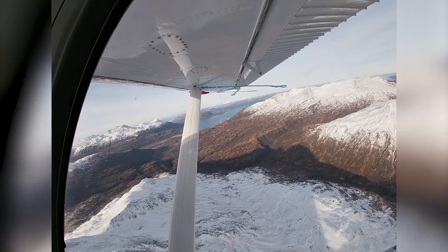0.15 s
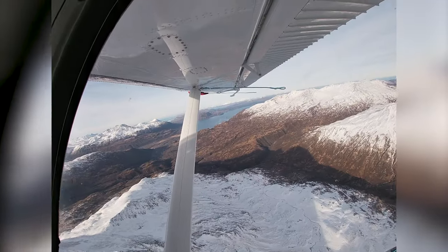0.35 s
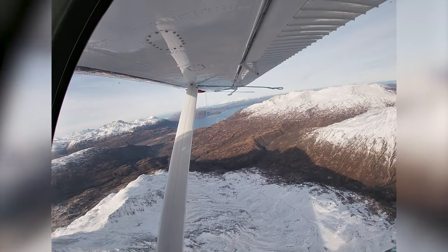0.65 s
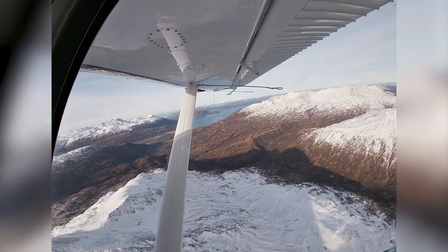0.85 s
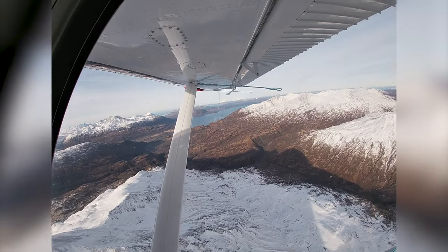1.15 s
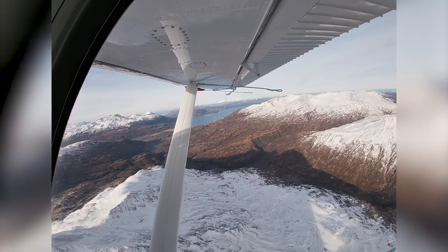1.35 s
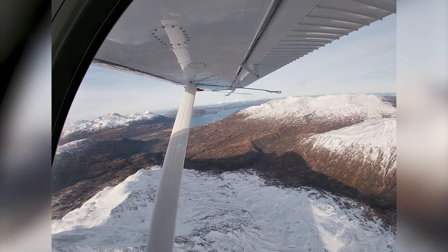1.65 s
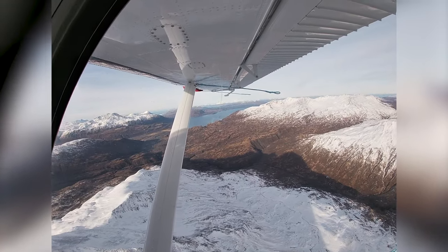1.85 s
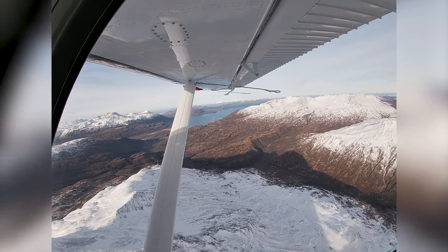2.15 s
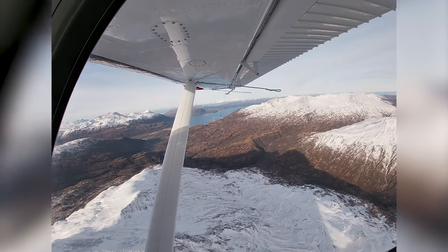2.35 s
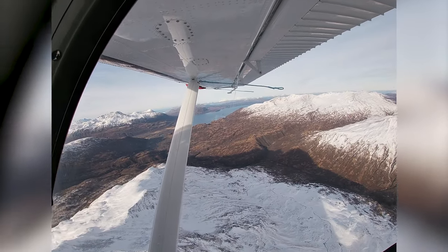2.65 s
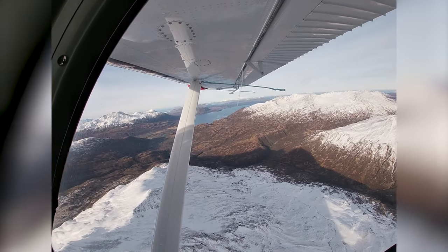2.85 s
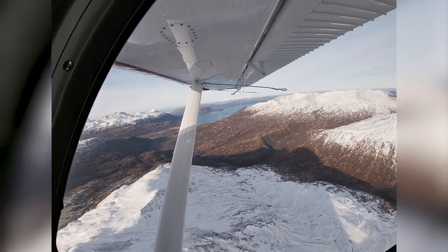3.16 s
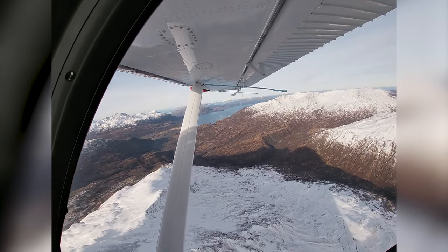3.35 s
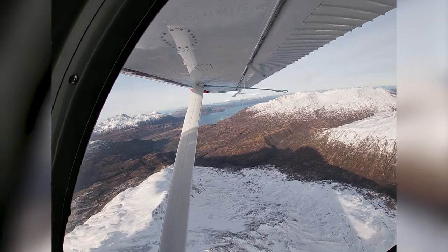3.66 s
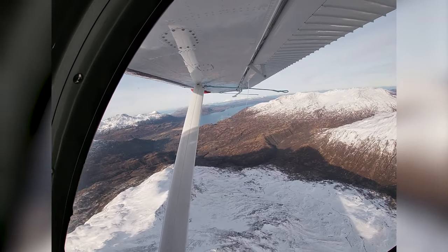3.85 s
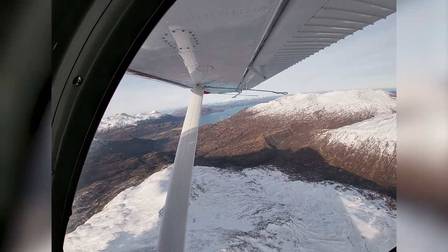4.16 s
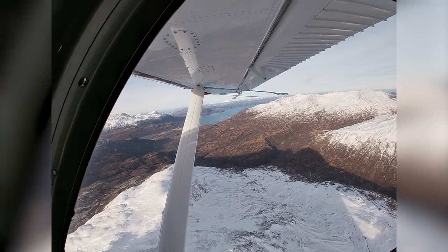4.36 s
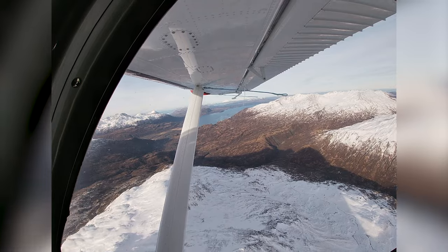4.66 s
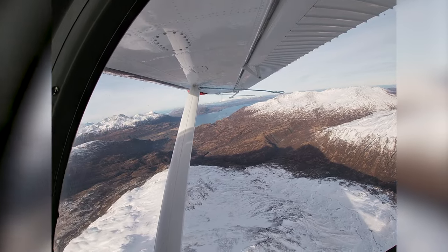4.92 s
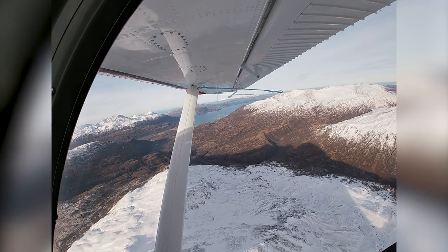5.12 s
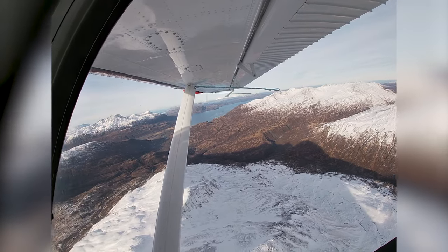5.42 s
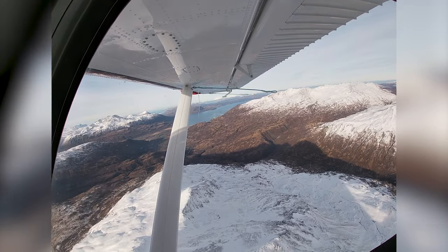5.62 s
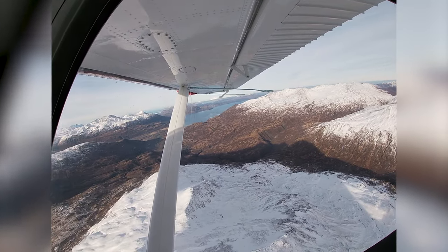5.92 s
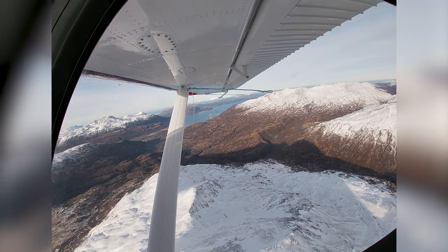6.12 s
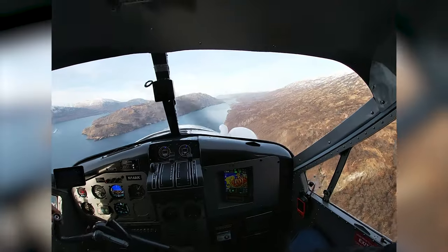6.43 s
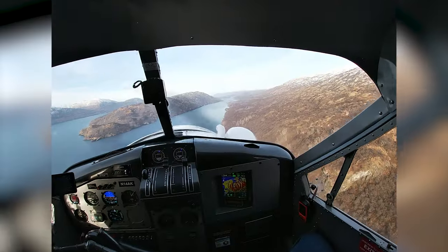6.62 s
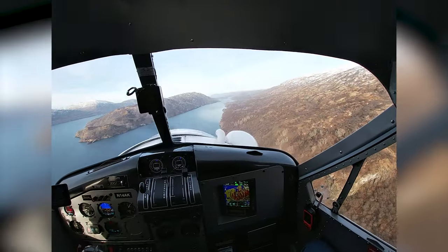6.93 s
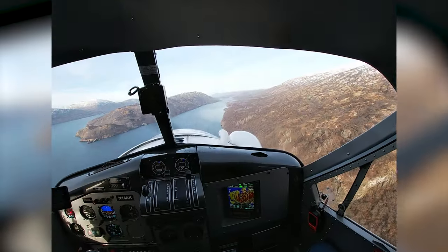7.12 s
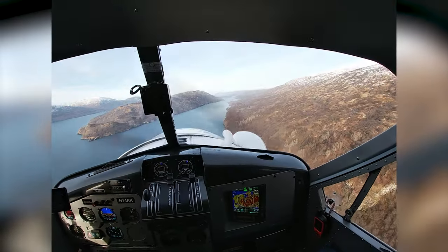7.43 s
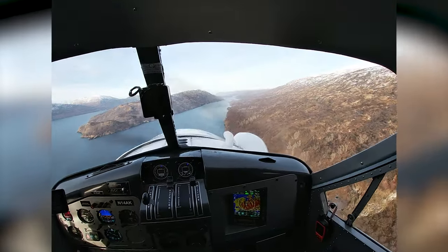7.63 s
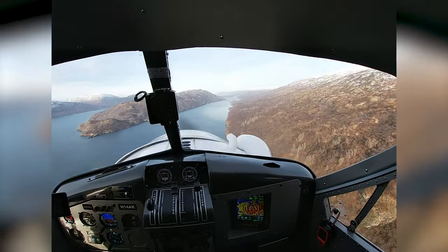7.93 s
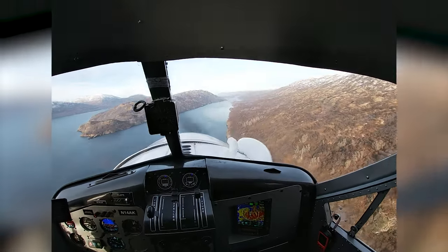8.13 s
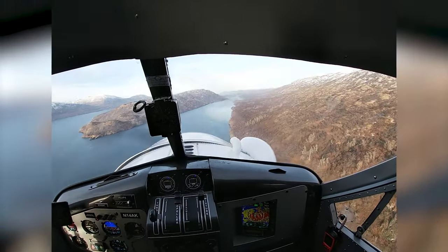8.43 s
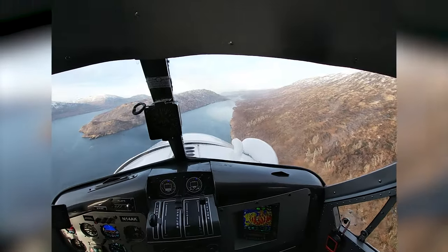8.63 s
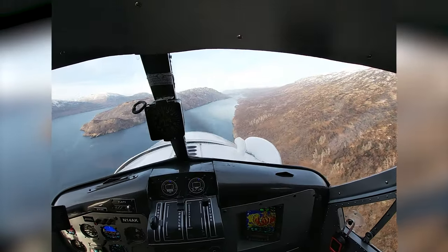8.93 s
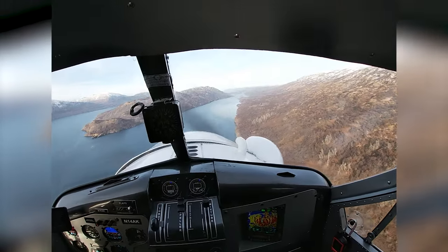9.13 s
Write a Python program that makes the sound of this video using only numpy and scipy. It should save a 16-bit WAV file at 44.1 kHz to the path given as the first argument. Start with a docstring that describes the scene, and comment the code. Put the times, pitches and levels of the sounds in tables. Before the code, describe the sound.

From 0 s the listener sits by the side window of a small propeller plane at cruise. A dense, low engine drone, strongest from about 60 to 190 Hz, throbs rapidly and evenly, with rumbling hull noise and soft slipstream hiss. From about 1.4 to 3 s the wind and the engine's rasp swell, and a window panel adds a faint, fluttering mid-pitched ring; a very faint whine and thin blade buzz sit above. This holds steadily to about 5 s, the ring then easing. At 6.3 s a tiny sharp click marks an instant change to the front seat: deeper, rounder, more propeller throb, less rasp. A brief low growl swells near 6.5 s, then the wind hiss dies down over the next two seconds. The engine's edge wavers, filling out from about 7.9 s, and the drone continues until it stops at about 9.3 s. Mono, close cabin sound.

```python
"""Cruising in a radial-engine plane

A nine-cylinder engine throbs under the hiss of the slipstream in a small propeller plane.
By the side window the exhaust booms and the wind swells; after an abrupt change with a click,
facing the windscreen, the three-blade propeller is stronger and the wind dies down.
Engine and blades are sums of shaft-locked harmonics; wind and the ringing panel are shaped noise.
"""
import sys
import numpy as np
from scipy import signal
from scipy.fft import rfft, irfft, next_fast_len
from scipy.io import wavfile
from scipy.ndimage import uniform_filter1d

SR = 44100
rng = np.random.default_rng(int(sys.argv[2]) if len(sys.argv) > 2 else 0)


def output_pcm(signal):
    """Save a mono or channel-first signal as 16-bit PCM at the path in sys.argv[1].

    Samples are clipped to [-1, 1] before scaling.
    """
    pcm = np.clip(np.atleast_2d(signal).T, -1, 1) * 32767
    wavfile.write(sys.argv[1], SR, np.round(pcm).astype(np.int16))


N = 409248
TIME = np.arange(N) / SR
CHANGE_S = 6.2815  # when the side seat gives way to the front seat
CYLINDERS = 9
BLADES_PER_CYCLE = 6  # three blades, two shaft turns per engine cycle
WHINE_ORDER = 31.7  # multiple of the cycle rate
HISS_PULSE_AT = 0.36  # share of the engine cycle at which the hiss and the window's ring peak (0-1)
BAND_LIMIT_HZ = 15800

# Cruise speed at each seat, drifting a little: [t/s, f/Hz of the engine cycle, two shaft turns each]
SIDE_SPEED = [(0, 15.815), (0.5, 15.816), (0.9, 15.836), (1.3, 15.826), (2, 15.843), (2.6, 15.821),
              (3.25, 15.807), (3.85, 15.826), (4.7, 15.807), (6.28, 15.822)]
FRONT_SPEED = [(6.28, 15.838), (7.1, 15.875), (7.6, 15.85), (8.2, 15.873), (8.8, 15.84), (9.28, 15.808)]
# Engine orders as the cabin colours them, 9 the firing rate and 6 the blade rate; the low ones boom, # and the
# rasp grows on the upper ones, from about 500 Hz: [multiple of the cycle rate, relative level/dB]
SIDE_ORDERS = [(2, -35.5), (3, -25.5), (4, -10.5), (5, -21.5), (6, -18.0), (7, -12.5), (8, -26.0),
               (9, -5.5), (10, -17.5), (11, 0.0), (12, -8.0), (13, -24.5), (14, -23.5), (15, -35.5),
               (16, -17.0), (17, -27.0), (18, -19.0), (19, -23.0), (20, -17.5), (21, -27.5), (22, -26.0),
               (23, -30.5), (24, -41.0), (25, -23.5), (26, -30.0), (27, -30.0), (28, -26.0), (29, -35.5),
               (30, -23.0), (33, -36.0), (34, -42.0), (35, -34.0), (36, -34.5), (39, -29.5), (40, -37.0),
               (41, -34.0), (42, -32.0), (43, -37.5), (45, -39.0), (47, -41.0), (48, -37.0)]
FRONT_ORDERS = [(2, -26.0), (3, -26.0), (4, -3.0), (5, -7.0), (6, 0.0), (7, -3.0), (8, -16.5), (9, -2.0),
                (10, -9.5), (11, 0.0), (12, -8.0), (13, -13.0), (14, -18.5), (15, -21.0), (16, -16.0),
                (17, -15.5), (18, -12.5), (19, -14.5), (20, -13.5), (21, -14.5), (22, -21.5), (23, -28.5),
                (24, -20.5), (25, -18.0), (26, -24.0), (27, -18.0), (28, -29.0), (29, -30.0), (30, -21.0),
                (31, -27.5), (32, -34.5), (33, -31.5), (34, -36.0), (35, -25.0), (36, -30.5), (37, -41.0),
                (38, -33.5), (41, -43.0), (42, -33.5), (44, -36.5), (48, -37.5)]
# Faint buzz of the blade tips: [multiple of the blade rate, rms level/dB before swell and waver]
SIDE_BUZZ = [(9, -61), (10, -57.5), (12, -61.5), (14, -71), (15, -71), (17, -70)]
FRONT_BUZZ = [(9, -61), (11, -69), (12, -61), (14, -68), (16, -71)]
# Colour of the air noise in the cabin: [f/Hz, relative level/dB per Hz]
SIDE_AIR = [(15, -19), (55, -5), (95, -2), (135, 1.3), (220, -3), (290, -6.5), (370, -13), (470, -14),
            (580, -16.5), (690, -18), (810, -24.5), (1250, -31.7), (1700, -29), (2900, -30.3),
            (3800, -37.2), (5700, -37.1), (6900, -52.5), (13000, -76)]
FRONT_AIR = [(15, -18), (55, -4), (100, -2), (135, -1.5), (170, -5.5), (220, -4), (310, -6.5), (500, -18),
             (640, -24.5), (780, -25.5), (1200, -29.3), (1500, -33), (1850, -37.5), (3000, -38.3),
             (4200, -44.8), (5800, -45), (6900, -58.5), (9000, -66), (13000, -83)]
# Slipstream swelling by the window, dying down at the windscreen:
# [start t/s, from level/dB, to level/dB, time constant/s]
SIDE_WIND = (1.37, -7.5, 1.5, 0.74)
FRONT_WIND = (6.5, 3, -5, 0.78)
# How strongly each pitch follows the wind's swell: [f/Hz, share/dB per dB]
SIDE_WIND_SHARE = [(250, 0.08), (450, 0), (650, 0.6), (1000, 0.7), (1350, 1.05), (2500, 0.76), (6000, 0.9)]
FRONT_WIND_SHARE = [(280, -0.017), (450, -0.4), (750, 0.7), (1350, 0.9), (2500, 0.92), (6000, 0.72)]
# Edge of the engine note, the level of its upper orders, growing by the window:
# [start t/s, from level/dB, to level/dB, time constant/s]
SIDE_EDGE = (1.5, -7, 0.04, 0.6)
# The same edge at the windscreen, thinning and filling out again: [t/s, level/dB]
FRONT_EDGE = [(6.3, -10), (6.55, -12), (6.95, -5), (7.2, -7.5), (7.5, -8), (7.9, 0.5), (8.5, 3), (9.28, 1)]
# Growl around 300 Hz at the windscreen: [t/s, level/dB]
FRONT_GROWL = [(6.3, 0), (6.55, 4), (6.8, -1), (7.1, 2), (7.5, -0.5), (7.9, 0.5), (8.3, 0.5), (9.28, 1)]
# The window's ring builds, holds and eases: [t/s, level/dB]
PANEL_SWELL = [(0, -9), (1.4, -8), (2.2, -2.5), (3.1, 0.5), (5.1, 0), (6.28, -5)]
# How the drone reaches each seat: [time round the exhaust ring/s, lag of the hull's bending waves
# at 100 Hz/s, share of a blade passage by which the propeller trails the engine (0-1),
# shift against the engine cycle/s, cabin boom f/Hz, boom width/Hz]
SIDE_PATH = (.0033, .0486, .68, .053, 144.5, 85)
FRONT_PATH = (.0072, .0369, .859, .0239, 91, 92)


def gain_of(db):
    """Turns decibels into amplitude."""
    return 10 ** (np.asarray(db) / 20)


def evened(x):
    """Scales to rms 1."""
    return x / np.sqrt(np.mean(abs(x) ** 2) + 1e-20)


def curve(points):
    """Joins (time, value) points by straight lines."""
    return np.interp(TIME, *np.transpose(points))


def settle(swell, t=TIME):
    """A level in dB that holds, then eases exponentially towards a new value."""
    start_s, from_db, to_db, ease_s = swell
    return to_db + (from_db - to_db) * np.exp(-np.maximum(t - start_s, 0) / ease_s)


def read(points, hz):
    """Reads a spectrum on a log-frequency axis."""
    f, value = np.transpose(points)
    return np.interp(np.log(hz + 1), np.log(f), value)


def wander(rate_hz):
    """Smooth random motion of rms 1, moving up to about rate_hz times a second."""
    size = 2048
    f = np.fft.rfftfreq(size, N / SR / size)
    lowpass = (f > 0) / (1 + (f / rate_hz) ** 4)
    slow = irfft(rfft(rng.standard_normal(size)) * lowpass)
    return np.interp(TIME, np.linspace(0, N / SR, size), evened(slow))


def band_filter(hz, width_hz):
    """A gentle resonance-like band around one pitch."""
    return signal.butter(2, [hz - width_hz / 2, hz + width_hz / 2], "bandpass", fs=SR, output="sos")


def crank(speed, jitter_cycles=0.00018, jitter_hz=3.3):
    """Engine cycles counted since the start; the shaft never turns quite evenly."""
    return np.cumsum(curve(speed)) / SR + jitter_cycles * wander(jitter_hz)


def air(spectrum, wind, share, level_db, patchy_db, gust_db):
    """Turbulence on the hull: a nearly steady rumble, and a hiss at the window seals that follows the wind."""
    size, hop = 2048, 512
    frames, hz = N // hop + 5, np.fft.rfftfreq(size, 1 / SR)
    t = np.arange(frames) * hop / SR
    real, imag, patches = rng.standard_normal((3, frames, len(hz)))
    # blur the patches over time, then over pitch
    patches = uniform_filter1d(patches, size=6, axis=0)
    patches = evened(uniform_filter1d(patches, size=24, axis=1))
    wind_db = settle(wind, t) + gust_db * np.interp(t, TIME, wander(5))
    field_db = read(spectrum, hz) + wind_db[:, None] * read(share, hz) + patchy_db * patches
    frames_of_noise = (real + 1j * imag) * gain_of(field_db)
    noise = signal.istft(frames_of_noise.T, nperseg=size, noverlap=size - hop)[1][:N]
    return gain_of(level_db) * evened(noise)


def shaken(noise, engine, cycles, depth, pulse_db, below_hz=900):
    """The rumble of the panels follows each throb of the engine; the hiss pulses faintly once a cycle."""
    throb = abs(signal.hilbert(engine, next_fast_len(N)))[:N]
    rumble = signal.sosfiltfilt(signal.butter(2, below_hz, fs=SR, output="sos"), noise)
    hiss = noise - rumble
    pulse = gain_of(pulse_db * np.cos(2 * np.pi * (cycles - HISS_PULSE_AT)))
    return rumble * (1 + depth * (throb / throb.mean() - 1)) + hiss * pulse


def whine(cycles, level_db=-52, waver_db=2.0, drift_rad=0.41):
    """A geared accessory sings a faint note between two orders of the engine."""
    phase = 2 * np.pi * WHINE_ORDER * cycles + drift_rad * wander(3)
    note = gain_of(waver_db * wander(3)) * np.cos(phase)
    return gain_of(level_db) * evened(note)


def panel_ring(cycles, level_db=-43.5, hz=650, width_hz=140, surge_db=4.0, kick_db=8, kick_share=0.053):
    """A window panel, jolted once in every engine cycle, rings in short irregular surges."""
    ring = signal.sosfilt(band_filter(hz, width_hz), rng.standard_normal(N))
    # signed distance from the jolt, in cycles
    from_jolt = (cycles - HISS_PULSE_AT + .5) % 1 - .5
    kick = np.exp(-(from_jolt / kick_share) ** 2)
    surging = ring * gain_of(surge_db * np.tanh(wander(16)) + kick_db * kick)
    return gain_of(level_db + curve(PANEL_SWELL)) * evened(surging)


def growl(sound, hz=300, width_hz=90):
    """One low band of the cabin sound swells and eases."""
    band = signal.sosfiltfilt(band_filter(hz, width_hz), sound)
    return sound + (gain_of(curve(FRONT_GROWL)) - 1) * band


def blade_buzz(cycles, buzz, swell_db, waver_db=2.0):
    """Thin high harmonics of the passing blades, each wavering on its own."""
    blades = 2 * np.pi * BLADES_PER_CYCLE * cycles
    lines = [gain_of(db + waver_db * wander(6.9)) * np.cos(round(k) * blades) for k, db in buzz]
    return gain_of(swell_db) * np.sqrt(2) * sum(lines)


def lags(path, order, rate):
    """Phase of one order: nine exhaust pulses a cycle limp by their unequal paths, and the hull smears them."""
    ring_s, bending_s, blade_share, shift_s, boom_hz, boom_width_hz = path
    hz, cylinder = order * rate, np.arange(CYLINDERS)
    if order % BLADES_PER_CYCLE:
        # every second cylinder fires in turn, and each pulse travels its own length of the exhaust ring
        arrival_s = (cylinder / rate + ring_s * (2 * cylinder % CYLINDERS)) / CYLINDERS
        source = np.angle(np.exp(-2j * np.pi * hz * arrival_s).sum())
    else:
        source = -2 * np.pi * blade_share * order / BLADES_PER_CYCLE
    # the cabin holds on to the pitches near its boom
    source -= 2 * np.arctan2(boom_width_hz / 2, boom_hz - hz)
    # bending waves travel with the root of their frequency, so the bass arrives last
    return source - 2 * np.pi * (hz * shift_s + 2 * bending_s * np.sqrt(100 * hz))


def drone(cycles, orders, path, edge_db, level_db, waver_db, drift_rad, flutter, upper_hz, burst_db, sway):
    """Engine and propeller orders, locked to the shaft and coloured by the cabin."""
    rate = (cycles[-1] - cycles[0]) / TIME[-1]
    turn = 2 * np.pi * cycles
    # the rasp comes in uneven bursts, a few firings long
    rasp_db = edge_db + burst_db * wander(30)
    out = np.zeros(N)
    for order, db in orders:
        k = round(order)
        # the short waves of the upper orders waver most, in level and phase, as the listener moves in the cabin
        upper = 1 / (1 + (upper_hz / (k * rate)) ** 4)
        swing_db = upper * (rasp_db + waver_db * wander(2.8))
        phase = lags(path, k, rate) + upper * drift_rad * wander(1.7)
        # every order, the low ones too, sways a little on its own
        swaying = 1 + sway * (wander(2.5) + 1j * wander(2.5))
        out += gain_of(db + swing_db) * (swaying * np.exp(1j * (k * turn + phase))).real
    # no two firings are equally strong
    return gain_of(level_db) * evened(out) * (1 + flutter * wander(22))


def side_seat():
    """By the side window: the exhaust booms, the wind swells and the window panel rings."""
    cycles, edge_db = crank(SIDE_SPEED), settle(SIDE_EDGE)
    engine = drone(cycles, SIDE_ORDERS, SIDE_PATH, edge_db, level_db=-14.0, waver_db=1.2,
                   drift_rad=0.2, flutter=0.004, upper_hz=540, burst_db=1.1, sway=0.015)
    rush = air(SIDE_AIR, SIDE_WIND, SIDE_WIND_SHARE, level_db=-26.5, patchy_db=0.5, gust_db=0.16)
    rush = shaken(rush, engine, cycles, depth=0.08, pulse_db=0.53)
    buzz = blade_buzz(cycles, SIDE_BUZZ, edge_db)
    return engine + buzz + whine(cycles) + panel_ring(cycles) + rush


def front_seat(buzz_share=0.6):
    """Facing the windscreen: deeper, with less hiss and more propeller, whose buzz eases with the wind."""
    cycles = crank(FRONT_SPEED)
    engine = drone(cycles, FRONT_ORDERS, FRONT_PATH, curve(FRONT_EDGE), level_db=-16.0, waver_db=1.8,
                   drift_rad=0.3, flutter=0.004, upper_hz=450, burst_db=0.8, sway=0.07)
    rush = air(FRONT_AIR, FRONT_WIND, FRONT_WIND_SHARE, level_db=-24.5, patchy_db=0.7, gust_db=0.45)
    rush = shaken(rush, engine, cycles, depth=0.08, pulse_db=0.25)
    buzz = blade_buzz(cycles, FRONT_BUZZ, buzz_share * settle(FRONT_WIND))
    return growl(engine + buzz + whine(cycles) + rush)


def click(level_db=-12.5, fade_s=0.00082):
    """A sharp step that dies at once, where the seat changes."""
    age = TIME - CHANGE_S
    return gain_of(level_db) * (age >= 0) * np.exp(-abs(age) / fade_s)


def scene():
    """One seat gives way to the other within a few milliseconds."""
    front = np.clip((TIME - CHANGE_S) / .004 + .5, 0, 1)
    mix = (1 - front) * side_seat() + front * front_seat() + click()
    return mix[None]


def record(dry):
    """The microphone sheds the deepest rumble; a brief fade-in and the band limit follow."""
    lean = signal.sosfiltfilt(signal.butter(2, 24, "highpass", fs=SR, output="sos"), dry)
    faded = lean * np.minimum(TIME / .005, 1)
    band_limit = signal.firwin(511, BAND_LIMIT_HZ, window=("kaiser", 9), fs=SR)
    return signal.oaconvolve(faded, band_limit[None], "same")


dry = scene()
out = record(dry)
output_pcm(out)
```